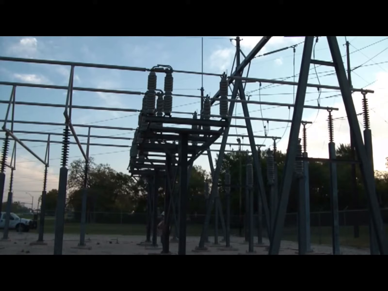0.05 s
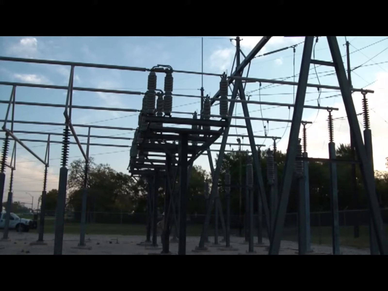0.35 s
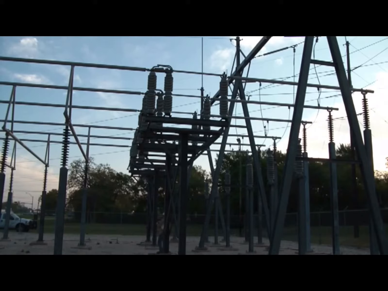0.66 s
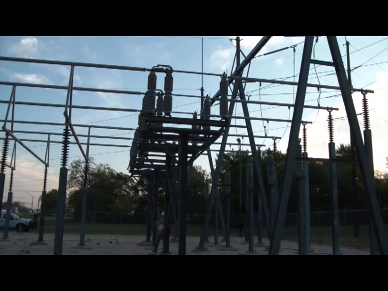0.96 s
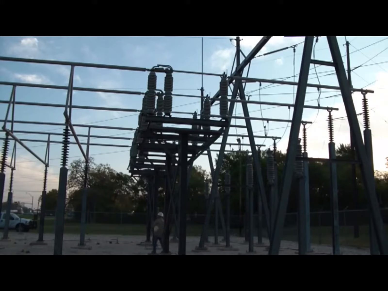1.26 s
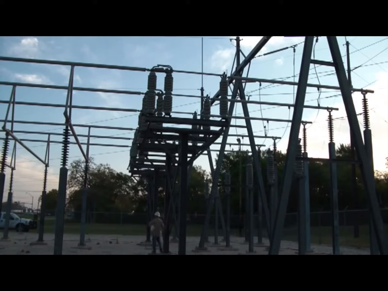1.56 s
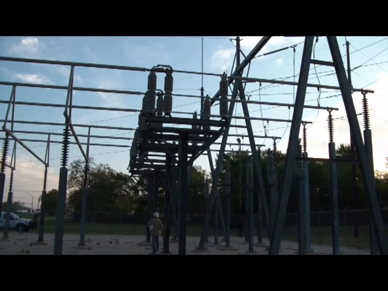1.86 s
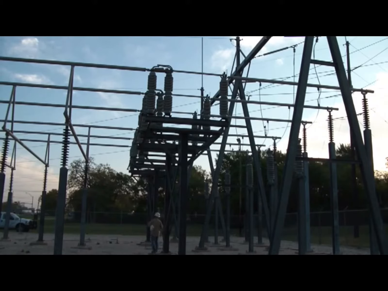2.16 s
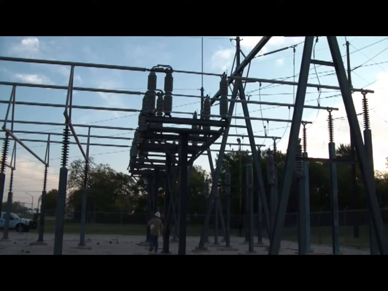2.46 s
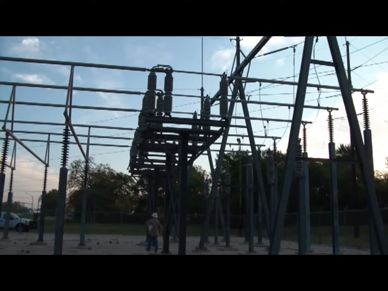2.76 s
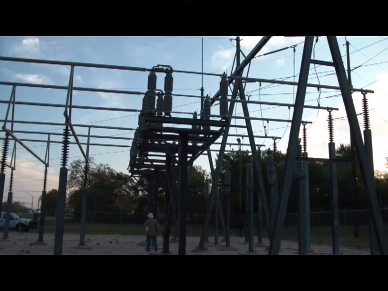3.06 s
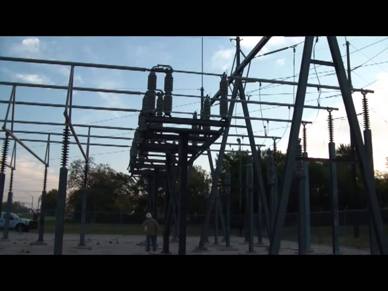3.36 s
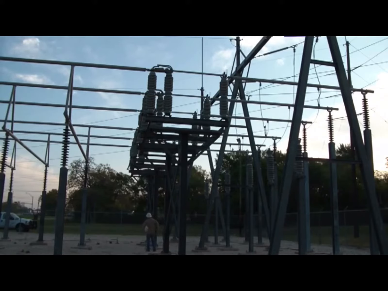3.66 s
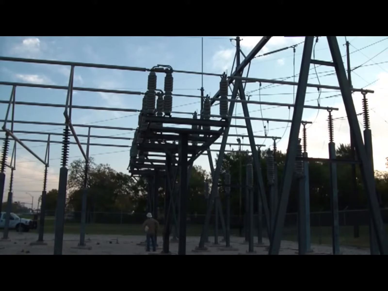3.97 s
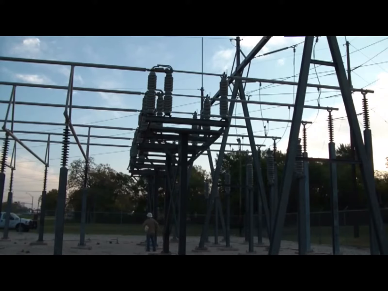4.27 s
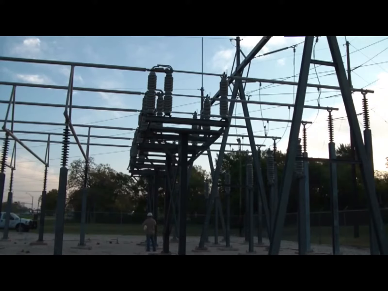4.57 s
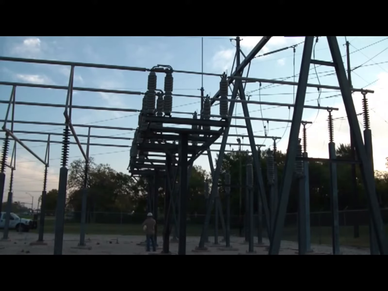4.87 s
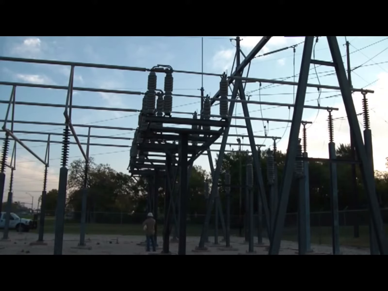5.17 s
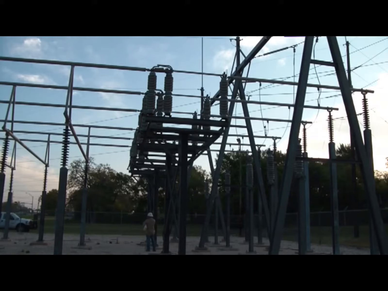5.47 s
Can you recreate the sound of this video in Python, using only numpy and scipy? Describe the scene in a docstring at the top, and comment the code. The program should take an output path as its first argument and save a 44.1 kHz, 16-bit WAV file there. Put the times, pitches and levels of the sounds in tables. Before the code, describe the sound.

A steady deep rumble of distant traffic with a soft tyre roar fills an outdoor electrical substation, with a faint transformer hum underneath. A low engine drone holds until about 1.5 seconds and then fades, while the tyre hiss eases. The rumble swells briefly at 2.5 seconds. In the first second a small bird whistles two notes, one clear, the next hoarse and falling. Very high, short chirps repeat every half second to one second from 0.5 seconds to the end. Short falling clucks come at about 0.9 and 1.2 seconds, in a cluster from 3.4 to 4.2, and again near 5.5. Farther birds twitter and rasp faintly, and a tiny crackle is barely heard at 4.4 seconds. The calls echo lightly off steel frames and trees. A thin, high camera whine and hiss continue throughout.

```python
"""Distant traffic rumbles and roars past an outdoor electrical substation, where transformers hum faintly.
An engine's exhaust drones on one low tone and fades. Small birds whistle, chirp, rasp and call
a high "tsip" and a falling "chuck"; these and one brief crackle echo off the steel frames and the trees.
A camera's electronics add a thin whine and hiss."""
import sys
import numpy as np
from scipy import signal
from scipy.fft import rfft, irfft
from scipy.io import wavfile

SR = 44100
rng = np.random.default_rng(int(sys.argv[2]) if len(sys.argv) > 2 else 0)


def file_out(sig):
    """Save sig as 16-bit WAV at sys.argv[1]."""
    # one column per channel
    cols = np.atleast_2d(sig).T
    # limit, then scale
    lim = np.clip(cols, -1, 1)
    pcm = np.round(lim * 32767).astype(np.int16)
    wavfile.write(sys.argv[1], SR, pcm)


N = 252252
TIME = np.arange(N) / SR


def from_db(db):
    """Turn decibels into a number to multiply by."""
    return 10 ** (np.asarray(db) / 20)


def rms_one(x):
    """Scale a sound so that its average strength (rms) is 1."""
    return x / np.sqrt(np.mean(x ** 2) + 1e-20)


def drift(turns_per_s):
    """A random wandering curve, about 1 in size."""
    turns = np.arange(0, N / SR + 1 / turns_per_s, 1 / turns_per_s)
    return rms_one(np.interp(TIME, turns, rng.standard_normal(8192)[:len(turns)]))


def noise(spectrum):
    """Noise of strength 1, shaped by rows of frequency and level."""
    hz, db = np.transpose(spectrum)
    bins = np.maximum(np.arange(N // 2 + 1) * SR / N, 1)
    gain = from_db(np.interp(np.log(bins), np.log(hz), db))
    edges = np.minimum(bins / hz[0], 1) ** 2 * np.minimum(hz[-1] / bins, 1) ** 2
    return rms_one(irfft(rfft(rng.standard_normal(N)) * gain * edges, N))


def phase_of(hz):
    """The growing angle (phase) of a wave whose pitch moves."""
    return 2 * np.pi * np.cumsum(hz) / SR


def progress(length):
    """Runs from 0 to 1 over a call; named u below."""
    return np.linspace(0, 1, int(length * SR))


def swell(u, rise, fall):
    """Fade in and out; rise and fall are shares of the length."""
    fade_in = np.sin(np.pi / 2 * np.clip(u / rise, 0, 1)) ** 2
    fade_out = np.sin(np.pi / 2 * np.clip((1 - u) / fall, 0, 1)) ** 2
    return fade_in * fade_out


def glide(length, start_hz, end_hz, rough):
    """Phase of a note that slides evenly and trembles in pitch."""
    u = progress(length)
    tremor = np.interp(u * length * 500, np.arange(400), rng.standard_normal(400))
    return phase_of((start_hz + (end_hz - start_hz) * u) * (1 + rough * tremor))


def add(out, start, sound):
    """Mix a sound in at a start time in seconds."""
    at = max(int(start * SR), 0)
    out[at:at + len(sound)] += sound[:max(N - at, 0)]


# The rumble's tone. Each row: frequency in Hz, relative level in dB.
RUMBLE_SPECTRUM = [(15, -17), (25, -7.5), (45, 0.5), (70, 0.5), (105, -1), (140, -5.5), (200, -11),
                   (260, -13), (320, -20.5), (500, -32.5)]
# Brief rises in the rumble. Each row: time of the peak in seconds, rise in dB.
RUMBLE_SWELLS = [(2.47, 4), (4.55, 1)]

def traffic_rumble(level_db=-17.5, waver_db=0.55, half_width_s=0.061):
    """A far road makes a deep noise that wavers and swells twice."""
    swells_db = sum(db * np.exp(-((TIME - peak) / half_width_s) ** 2) for peak, db in RUMBLE_SWELLS)
    return from_db(level_db + swells_db + waver_db * drift(2.8)) * noise(RUMBLE_SPECTRUM)


# The tone of the tyres' roar and hiss. Each row: frequency in Hz, relative level in dB.
ROAR_SPECTRUM = [(200, -16), (330, -5), (500, 1.5), (700, -1.5), (1000, -2.5), (1400, -6.5), (1900, -12.5),
                 (2600, -22), (4000, -36.5)]
HISS_SPECTRUM = [(1200, -7.5), (2000, 2), (2900, 1.5), (3600, -1), (4600, -9), (6000, -19.5), (9000, -27.5)]
# The roar as time passes. Each row: time in seconds, relative level in dB.
ROAR_LEVELS = [(0.0, -24), (1.23, -24), (2.79, -26), (5.66, -27), (5.72, -27)]

def tyres(hiss_db_per_roar_db=2.8):
    """Tyres roar on the road. As the traffic draws away, their hiss fades faster than their roar."""
    roar_db = np.interp(TIME, *np.transpose(ROAR_LEVELS))
    hiss_db = -39.5 + hiss_db_per_roar_db * (roar_db + 25)
    return from_db(roar_db + 0.99) * noise(ROAR_SPECTRUM) + from_db(hiss_db) * noise(HISS_SPECTRUM)


def engine(start_hz=76.9, idle_hz=70.0, sag_hz_per_s=2.0, hold_s=1.4, fade_db_per_s=9.5):
    """An exhaust drones, holding its level and then fading, while the firing slows to idle."""
    firing_hz = np.maximum(start_hz - sag_hz_per_s * TIME, idle_hz)
    level_db = -20 - fade_db_per_s * np.maximum(TIME - hold_s, 0) + 2.0 * drift(7.27)
    return from_db(level_db) * np.sqrt(2) * np.sin(phase_of(firing_hz + 0.78 * drift(8.24)))


# The tones of the hum. Each row: pitch in Hz, average level in dB.
HUM_TONES = [(120, -38), (240, -44), (360, -42), (600, -37.3)]

def transformers(waver_db=1.2, waver_hz=1.6):
    """The cores hum at even multiples of the mains frequency; moving air makes each tone waver."""
    out = np.zeros(N)
    for hz, db in HUM_TONES:
        gain = from_db(db + waver_db * drift(5)) * np.sqrt(2)
        out += gain * np.sin(phase_of(hz + waver_hz * drift(9)))
    return out


# The camera's steady tones. Each row: pitch in Hz, level in dB.
STEADY_TONES = [(8990, -69), (10427, -84), (11267, -77), (12207, -65)]
# The tone of its hiss. Each row: frequency in Hz, relative level in dB.
CAMERA_HISS = [(3000, 2), (6000, 2.5), (9000, -1), (10300, 4.5), (12000, -1), (15000, -8)]

def camera(whine_hz=10226, bursts_per_s=59.94, whine_db=-44.5, hiss_db=-49.0):
    """The electronics whine in one burst per picture scan, over steady tones and hiss."""
    scan = (TIME * bursts_per_s - .08) % 1
    whine = swell(scan / .94, rise=.14, fall=.18) * np.sin(2 * np.pi * whine_hz * scan / bursts_per_s)
    tones = sum(from_db(db) * np.sqrt(2) * np.sin(2 * np.pi * hz * TIME) for hz, db in STEADY_TONES)
    return from_db(whine_db) * whine + tones + from_db(hiss_db) * noise(CAMERA_HISS)


# A two-note song. Each row: start and length in seconds, first and last pitch in Hz, base level in dB,
# level of the octave in dB against the lowest tone, tremble as a share of the pitch.
SONG_NOTES = [(0.112, 0.234, 2662, 2609, -38.5, 9.5, 0.0098), (0.5, 0.25, 2733, 2460, -33.5, -8.5, 0.037)]

def whistles(third_db=-23.0, flutter_db=3.5, growth_db=5.0, thin_hz=7460, thin_db=-53.0):
    """A bird sings a clear note, then a hoarse falling one; each flutters and grows under a thin tone."""
    out, flutter = np.zeros(N), drift(109.6)
    for start, length, start_hz, end_hz, db, octave_db, rough in SONG_NOTES:
        u, phase = progress(length), glide(length, start_hz, end_hz, rough)
        overtones = np.sin(2 * phase) + from_db(third_db) * np.sin(3 * phase)
        note = from_db(db) * (np.sin(phase) + from_db(octave_db) * overtones)
        thin = from_db(thin_db) * np.sin(glide(length, thin_hz, thin_hz, rough=.012))
        change_db = growth_db * (u - .5) + flutter_db * flutter[int(start * SR):][:len(u)]
        add(out, start, swell(u, rise=0.24, fall=.3) * from_db(change_db) * (note + thin))
    return out


def twitter(notes_per_s=6.0, low_hz=2390, high_hz=3930, slide_share=0.103, typical_s=0.04, db=-48.0):
    """The farthest birds call at random: faint extra rows for chirps() to play."""
    draws = rng.random((64, 4))[:int(notes_per_s * N / SR)]
    notes = []
    for when, pitch, slide, stretch in draws:
        start_hz = low_hz * (high_hz / low_hz) ** pitch
        end_hz = start_hz * (1 + slide_share * (2 * slide - 1))
        notes.append((when * TIME[-1], typical_s * (.5 + stretch), start_hz, end_hz, db))
    return notes


# Short far notes. Each row: start and length in seconds, first and last pitch in Hz, level in dB.
TREE_CHIRPS = [(.29, 0.051, 2240, 2170, -31.5), (.908, 0.045, 2275, 2227, -30),
               (1.455, 0.026, 4800, 4700, -40), (1.865, 0.03, 3600, 3750, -41),
               (1.938, 0.032, 4470, 5030, -34.5), (2.402, 0.023, 4850, 5200, -40)]

def chirps(rough=0.0084):
    """Birds call far off in the trees, so only their strongest tone carries."""
    out = np.zeros(N)
    for start, length, start_hz, end_hz, db in list(TREE_CHIRPS) + twitter():
        shape = swell(progress(length), rise=.25, fall=.25)
        add(out, start, from_db(db) * shape * np.sin(glide(length, start_hz, end_hz, rough)))
    return out


# High rising calls. Each row: start in seconds, top pitch in Hz, level in dB.
TSIP_CALLS = [(0.5, 8140, -33), (1.391, 7920, -30.5), (2.423, 7880, -30), (3.069, 7900, -29),
              (3.702, 8000, -33), (4.406, 8130, -33), (4.86, 7870, -31.5), (5.310, 7730, -34.5),
              (5.623, 8100, -33)]

def tsips(length_s=0.0246, sweep_share=0.33, sweep_s=0.0047, rough=0.0063):
    """A bird's almost pure tone shoots up and levels off at its top pitch."""
    out, tremor = np.zeros(N), drift(560)
    u = progress(length_s)
    sweep = 1 - sweep_share * np.exp(-u * length_s / sweep_s)
    for start, top_hz, db in TSIP_CALLS:
        at = int(start * SR)
        hz = top_hz * (sweep + rough * tremor[at - len(u):at])
        add(out, start, from_db(db) * swell(u, rise=0.16, fall=0.59) * np.sin(phase_of(hz)))
    return out


# Falling calls, near and far. Each row: start and length in seconds, upper and final pitch in Hz,
# base level in dB, third harmonic in dB against the second, bend (1 falls evenly, more drops later).
CHUCK_CALLS = [(0.9, 0.059, 1638, 1270, -24.5, 0, 3.35), (1.247, 0.052, 1626, 1070, -22, -10.5, 1.53),
               (2.19, .06, 1980, 1590, -43, -14, 1.1), (3.446, 0.066, 1730, 1195, -33, 1, 1.9),
               (3.599, 0.067, 1770, 1480, -41, -14, 1.17), (3.768, 0.07, 1830, 1350, -35, -10, 1.3),
               (3.844, .06, 1674, 1093, -28, -9, 1.3), (4.185, 0.059, 1710, 1033, -24, -10.5, 1.2),
               (5.203, 0.068, 1736, 1060, -40, -19, 1.1), (5.496, 0.065, 1810, 1070, -33, -14, 0.92)]

def chucks(rough=0.025, scoop_share=0.08, beak_cutoff_hz=6800):
    """A bird's harmonics (multiples of its pitch) scoop up, then drop; the fifth comes out late."""
    out, tremor = np.zeros(N), drift(900)
    for start, length, upper_hz, end_hz, db, third_db, bend in CHUCK_CALLS:
        u = progress(length)
        arch_hz = upper_hz * (1 - scoop_share * np.exp(-10 * u)) + (end_hz - upper_hz) * u ** bend
        phase = phase_of(arch_hz * (1 + rough * tremor[int(start * SR):][:len(u)]))
        harmonics_db = {2: 0, 3: third_db, 4: -12.5, 6: -27.0}
        early = sum(from_db(level) * np.sin(k * phase) for k, level in harmonics_db.items())
        late = from_db(-12) * np.sin(2 * phase)
        late += from_db(-15) * (np.sin(5 * phase) + .5 * np.sin(6 * phase))
        voice = early * swell(u, rise=.25, fall=.75) ** 1.5 + late * swell(u, rise=.6, fall=.2)
        add(out, start, from_db(db) * voice)
    return signal.sosfilt(signal.butter(4, beak_cutoff_hz, fs=SR, output="sos"), out)


# Short hoarse calls. Each row: start and length in seconds, centre frequency in Hz, level in dB.
RASP_CALLS = [(1.667, 0.051, 4570, -44), (3.55, .06, 5200, -51), (5.472, 0.055, 4270, -44)]

def rasps(edge_ratio=1.25):
    """A bird rasps: brief puffs of noise in a narrow band of frequencies."""
    out, white = np.zeros(N), rng.standard_normal(N)
    for start, length, hz, db in RASP_CALLS:
        u = progress(length)
        band = signal.butter(2, [hz / edge_ratio, hz * edge_ratio], "band", fs=SR, output="sos")
        puff = rms_one(signal.sosfilt(band, white[int(start * SR):][:len(u)]))
        add(out, start, from_db(db) * swell(u, rise=0.25, fall=0.33) * puff)
    return out


# One faint crackle: start and length in seconds, level in dB.
CRACKLE_BURST = (4.42, .11, -49)

def crackle(ticks_per_s=700, band_hz=(8500, 13000)):
    """A brief spray of tiny bright ticks."""
    start, length, db = CRACKLE_BURST
    ticks = rng.standard_normal(N) * (rng.random(N) < ticks_per_s / SR)
    bright = signal.sosfilt(signal.butter(2, band_hz, "band", fs=SR, output="sos"), ticks + 1e-18)
    return from_db(db) * swell((TIME - start) / length, rise=0.53, fall=.3) * rms_one(bright)


def yard_echo(sound, frames_db, trees_db, frames_s=0.18, trees_s=0.57, build_s=0.034):
    """Near steel frames scatter echoes, then a soft tail builds up from the trees."""
    t = TIME[:SR]
    frames = rng.standard_normal(SR) * (rng.random(SR) < 900 / SR) * (t > .004)
    frames *= from_db(-60 * t / frames_s)   # frames_s and trees_s: time to fade by 60 dB
    trees = rng.standard_normal(SR) * (1 - np.exp(-(t / build_s) ** 2)) * from_db(-60 * t / trees_s)
    echoes = (from_db(frames_db) * rms_one(frames) + from_db(trees_db) * rms_one(trees)) / np.sqrt(SR)
    return sound + signal.fftconvolve(sound, echoes)[:N]


def scene():
    """Mix the echoing birds and crackle with the traffic, hum and camera, in one channel."""
    birds = yard_echo(tsips(), frames_db=-4.5, trees_db=-8.0, frames_s=.15, trees_s=.4)
    birds += yard_echo(chucks(), frames_db=-11.0, trees_db=-12.0, frames_s=.1, trees_s=.8)
    birds += yard_echo(whistles(), frames_db=-4.0, trees_db=-7.0)
    far = yard_echo(chirps() + rasps() + crackle(), frames_db=-6.0, trees_db=-7.0)
    traffic = traffic_rumble() + tyres() + engine()
    return (traffic + transformers() + camera() + birds + far)[None]


def record(dry, cutoff_hz=15100):
    """Fade both ends over a few milliseconds and cut off the highest treble steeply."""
    eased = dry * swell(TIME / TIME[-1], rise=.001, fall=.001)
    return signal.sosfilt(signal.ellip(12, .1, 90, cutoff_hz, fs=SR, output="sos"), eased)


dry = scene()
out = record(dry)
file_out(out)
```